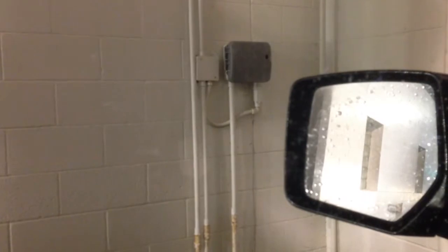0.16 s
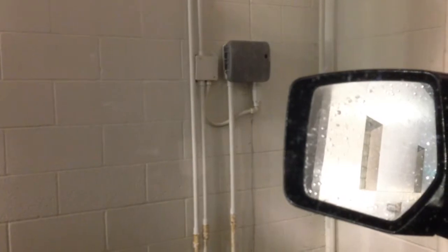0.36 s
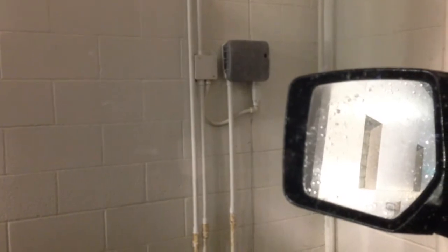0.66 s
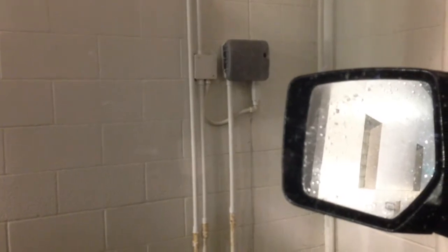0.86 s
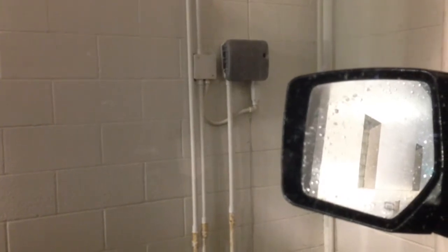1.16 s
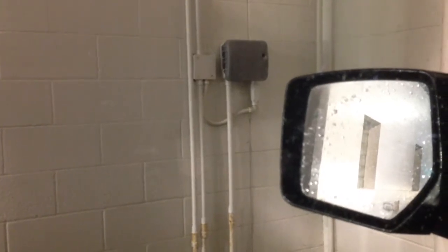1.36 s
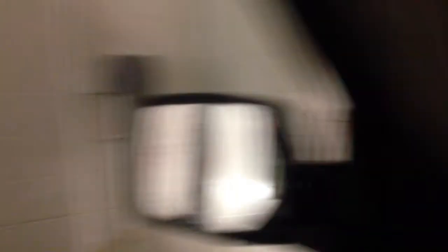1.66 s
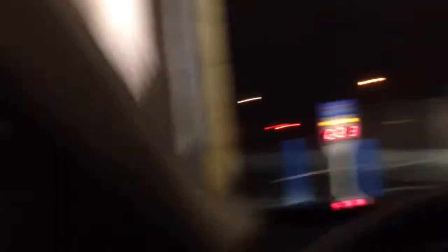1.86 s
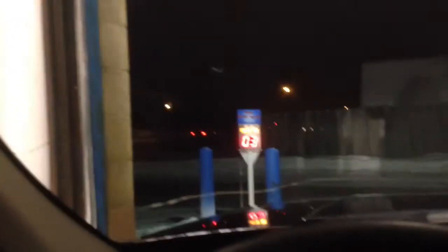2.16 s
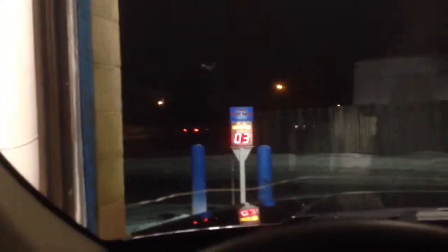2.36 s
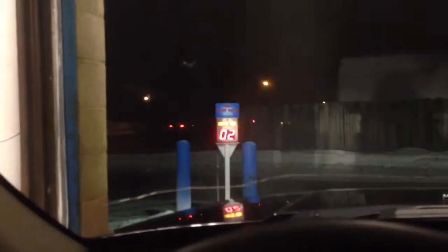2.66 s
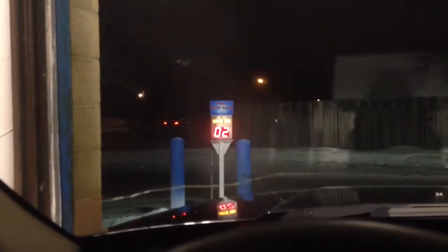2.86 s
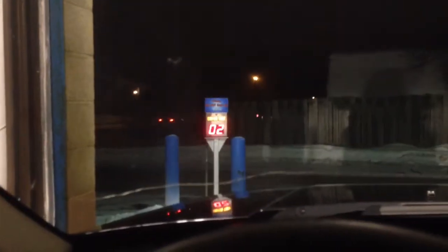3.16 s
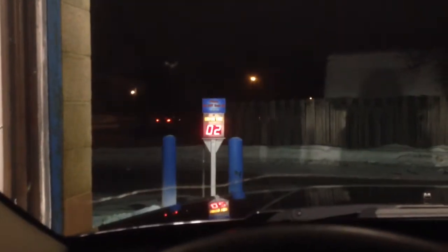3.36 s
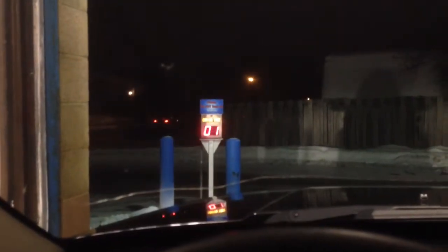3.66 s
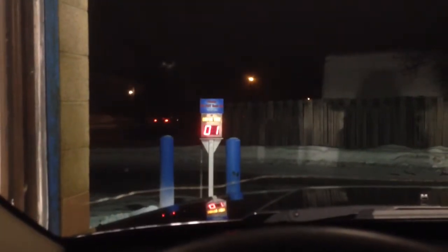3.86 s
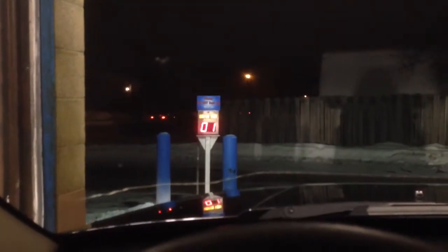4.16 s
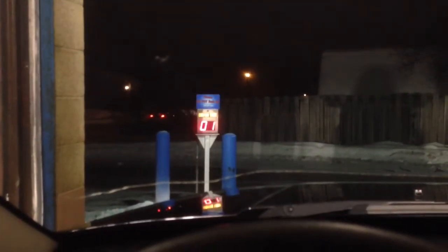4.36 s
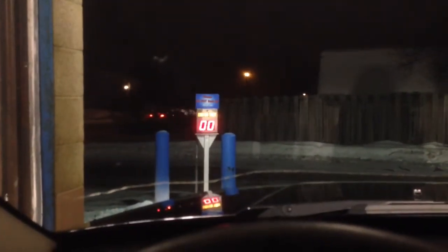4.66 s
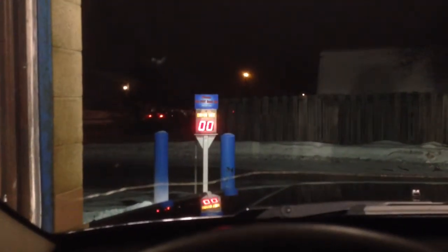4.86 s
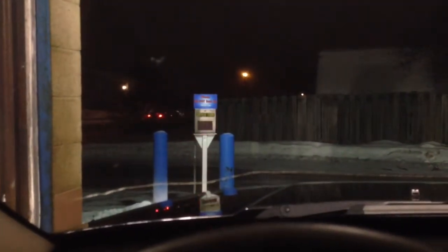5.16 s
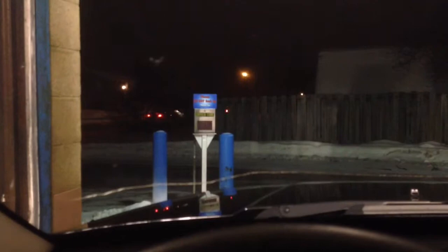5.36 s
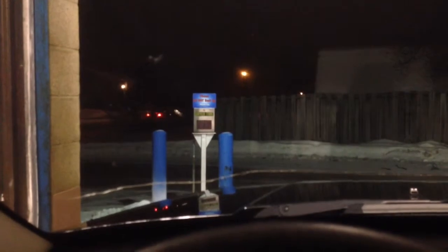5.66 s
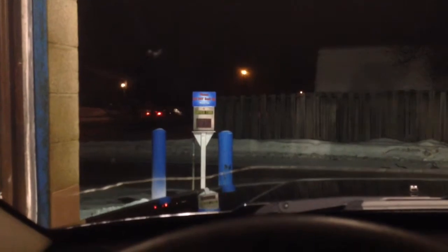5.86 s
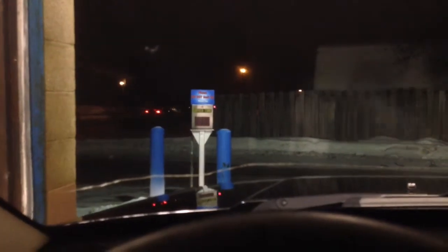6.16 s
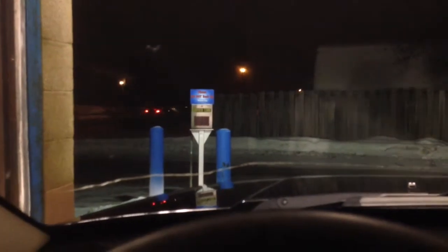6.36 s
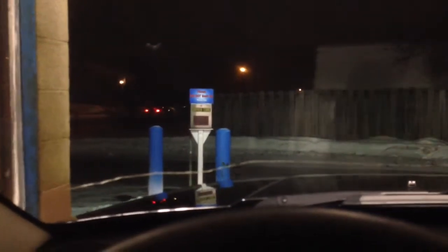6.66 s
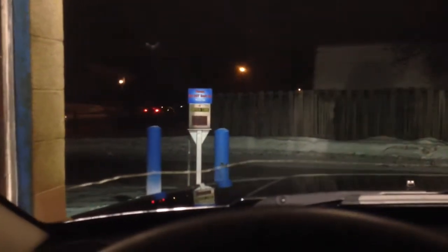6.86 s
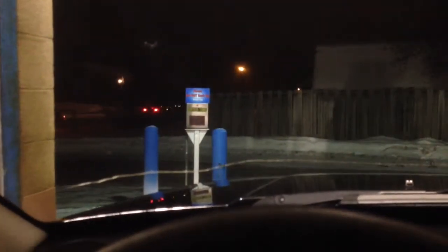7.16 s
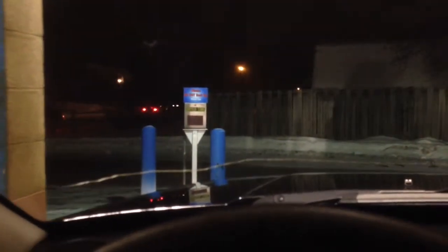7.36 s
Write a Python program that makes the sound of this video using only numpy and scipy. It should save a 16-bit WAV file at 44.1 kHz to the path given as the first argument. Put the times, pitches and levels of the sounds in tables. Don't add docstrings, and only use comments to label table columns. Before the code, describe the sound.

A car wash blower roars against a closed car, heard from inside as a deep buffeting boom with muffled rushing air, easing down at the end.

```python
import sys
import numpy as np
from scipy import signal
from scipy.fft import rfft, irfft
from scipy.io import wavfile
from scipy.ndimage import uniform_filter1d

SR = 44100
rng = np.random.default_rng(int(sys.argv[2]) if len(sys.argv) > 2 else 0)


def pcm_store(signal):
    levels = np.round(np.clip(np.atleast_2d(signal), -1, 1) * 32767)
    wavfile.write(sys.argv[1], SR, levels.astype(np.int16).T)


def amplitude_ratio(level_db):
    exponent = np.asarray(level_db, float) / 20
    return 10 ** exponent


N = 330750
T = np.arange(N) / SR
HZ = np.fft.rfftfreq(N, 1 / SR)

# (time [s], level [dB])
POWER_DB = [(0, -0.5), (1.5, 0.5), (3, 0), (4.5, 0.5), (5.1, -0.15), (5.5, -1.5), (5.9, -2), (6.3, -3.5),
            (6.7, -5), (7.05, -5), (7.2, -7.5), (7.5, -9)]
# (level at full power [dB], share of a power change followed [dB/dB])
THRUM_LAW = (-26, .4)
BOOM_LAW = (-16.5, 0.86)
RUSH_LAW = (-29, 0.97)
HISS_LAW = (-48, 1)
WHINE_LAW = (-45.5, 0.86)
MOAN_LAW = (-42, 0.27)
# (time [s], share [0-1])
SWING = [
    (0, 0.08),
    (1.45, 0.26),
    (1.75, 0.4),
    (2.05, 0.99),
    (7.5, 0.84),
]

# (frequency [Hz], density [dB per Hz])
THRUM_SPECTRUM = [(15, -30), (25, -20), (40, -8.5), (50, -4), (57, 6.5), (64, -7), (72, -3.5), (90, -14),
                  (150, -60), (400, -150)]
BOOM_SIDE = [(38, -41.5), (65, -12), (86, -6.5), (118, 1), (156, -3.5), (170, 0), (189, -6.5), (254, -11.5),
             (300, -20.5), (390, -51), (660, -120)]
BOOM_FRONT = [(38, -35.5), (65, -7.5), (86, -10.5), (119, -3), (161, 0), (195, -5.5), (231, -21.5),
              (300, -27), (390, -51.5), (660, -120)]
# (frequency [Hz], density [dB per Hz])
RUSH_SIDE = [(140, -31), (230, -3), (346, -12), (384, -13.5), (409, -28.5), (440, -15.5), (583, -14.5),
             (648, -23), (841, -18), (1050, -26.5), (1200, -26.5), (1770, -24), (2800, -40), (3640, -68.5),
             (6160, -120)]
RUSH_FRONT = [(140, -34), (230, -5.5), (328, -2.5), (409, -3), (444, -5.5), (548, -4), (750, -6.5),
              (850, -12), (954, -9.5), (1130, -13), (1580, -13.5), (2200, -20.5), (2800, -30), (3640, -56),
              (6160, -120)]
HISS_SPECTRUM = [(1800, -41.5), (2500, -3.5), (2900, -0.5), (3700, -2), (5000, -10), (7000, -19),
                 (10000, -28), (15500, -43)]
# (frequency [Hz], width [Hz], lift [dB])
RINGS_SIDE = [(112, 1.6, 3), (160.3, 18, 5), (346, 35, 2.5), (412, 25, 3.5), (600, 29, 4), (1192, 68, 7),
              (1350, 35, 2), (3246, 80, -0.5)]
RINGS_FRONT = [(122.5, 5.9, 4), (137, 16, 5), (156.6, 2.5, 5), (332, 41, 5), (485, 23, 5.5), (929, 14, 6),
               (1107, 28, -6), (1360, 26, 0), (3150, 41, 4.5)]
# (time [s], lift [dB], length [s])
BUFFETS = [(0.033, 5, 0.053), (0.277, 4.5, 0.1), (0.537, -1, 0.092), (.75, 2, 0.11), (0.974, 2, 0.12),
           (1.25, 4, 0.051), (1.464, -4.5, .05), (1.566, 3.5, 0.16), (2.02, 1.5, 0.069),
           (2.227, 6.5, 0.029), (2.485, 2.5, 0.15), (2.863, 1.5, .08), (3.284, 4.5, 0.038),
           (3.588, 2, 0.06), (3.758, 4, .08), (4.067, 2.5, .05), (4.165, -1.5, 0.052), (4.292, 6, 0.049),
           (4.498, 7.5, 0.044), (5.016, 1.5, 0.17), (5.494, -4, .05), (5.595, 2.5, 0.11),
           (5.924, 6.5, 0.023), (6.9, 0, 0.27), (7.173, -6.5, 0.037), (7.5, -11, 0.013)]
# (time [s], lift [dB], length [s])
SURGES = [(.04, 3.5, 0.045), (.25, -2, 0.11), (.57, 5, 0.087), (.86, -3.5, 0.091), (1.167, 5, 0.069),
          (1.27, -5, .06), (1.88, 6, .05), (2.04, 4, .05), (2.29, -2, .06), (2.578, 8.5, .05),
          (2.776, 6, .05), (3.07, -7.5, .06), (3.16, 5, .04), (3.3, -9, .05), (3.76, -4.5, 0.047),
          (3.94, -1, .05), (4.04, 6, 0.034), (4.103, -6, 0.022), (4.179, 10.5, 0.035), (4.5, 1.5, 0.056),
          (4.85, 5.5, 0.16), (5.17, -3, 0.037), (5.39, -18, 0.045), (5.507, 3.5, 0.045), (5.972, 11, 0.031),
          (6.41, 7.5, .08), (6.64, 4, .04), (7.04, 3.5, 0.068), (7.188, -4, .05), (7.472, 3.5, 0.056)]
# (frequency [Hz], width [Hz], level [dB])
WHINE_TONES = [(1550, 31, 0.5), (1697, 49, -2), (1814, 31, -3), (3125, 50, -18.5)]
MOAN_TONES = [(441, 38, 0)]
# (time [s], whine lift [dB], moan lift [dB], length [s])
SINGING = [(.57, 3, 2, .06), (.92, 11, 1.5, .06), (1.78, 1.5, 7.5, .1), (2.45, 1, 1.5, .15),
           (3.35, 3.5, 0.5, .1), (3.608, 5, 7, 0.037), (3.78, 2.5, -13, .06), (4.25, 3, 0, .06),
           (5.778, 4, -4, 0.073), (4.075, 6, -2, 0.044), (4.51, 0.5, 1.5, 0.21), (5.928, 0.5, 7, .06),
           (6.244, 4.5, 8, 0.056), (6.55, 5, -2, 0.09), (6.703, 3.5, 8.5, .08), (6.93, -1, 4, .06),
           (7.25, -8, -2.5, .15)]
# (peak time [s], bright level [dB], dull level [dB], length [s])
SPITS = [(.611, -66.5, -70, 0.0088), (1.092, -67.5, -64, .008), (1.167, -67.5, -65, .008),
         (1.29, -68, -59, .008), (1.74, -60.5, -55, 0.016), (2.362, -74.5, -68, .008),
         (2.572, -72.5, -66, 0.0073), (2.591, -55.5, -50, .016), (2.646, -70, -70, .008),
         (2.951, -71.5, -70, 0.0087), (3.032, -62, -60, 0.013), (3.355, -69.5, -70, .008),
         (3.49, -70, -67, .008), (3.739, -68.5, -66, .008), (3.802, -66, -63, 0.007),
         (3.859, -61, -59, 0.012), (3.928, -63, -62, .01), (3.963, -70.5, -67, .008),
         (4.173, -62, -57, .012), (4.422, -71.5, -66, 0.0069), (4.558, -73.5, -65, 0.0088),
         (4.823, -69, -67, .008), (5.030, -58.5, -51, .016), (5.082, -67.5, -60, .012),
         (5.406, -66.5, -55, .01), (5.474, -61.5, -61, .012), (5.750, -61, -56.5, .014),
         (5.995, -65, -48.5, .004), (6.919, -73, -75, 0.0052)]
# (frequency [Hz], density [dB per Hz])
SELF_NOISE_SPECTRUM = [(2000, -18.5), (5000, 4.5), (9000, -4), (12000, -2), (16000, -4.5)]


def white():
    return rng.standard_normal(N)


def evened(x):
    return x / np.sqrt(np.mean(x ** 2) + 1e-20)


def curve(rows, order=1):
    rows = np.array(rows)
    return np.interp(T, rows[:, 0], rows[:, order])


def driven(law, swells=(), order=1):
    full_db, share = law
    level_db = full_db + share * curve(POWER_DB)
    for row in swells:
        time_s, lift_db, length_s = row[0], row[order], row[-1]
        level_db = level_db + lift_db * np.exp(-((T - time_s) / length_s) ** 2)
    return amplitude_ratio(level_db)


def colour(noise, points, rings=()):
    points_hz, points_db = np.transpose(points)
    shape_db = np.interp(np.log(HZ + 1), np.log(points_hz + 1), points_db)
    for hz, width_hz, lift_db in rings:
        shape_db = shape_db + lift_db / (1 + (2 * (HZ - hz) / width_hz) ** 2)
    return evened(irfft(rfft(noise) * amplitude_ratio(shape_db), N))


def steadied(x, share, seconds):
    window = int(seconds * SR)
    power = uniform_filter1d(uniform_filter1d(x ** 2, window), window)
    return evened(x / (abs(power) + 1e-9) ** (share / 2))


def gusty(x, patchy_db, flicker_db):
    z = signal.stft(x, nperseg=512, noverlap=384)[2]
    patches = rng.standard_normal(z.shape[::-1]).T
    patches = uniform_filter1d(patches, size=6, axis=0)
    patches = evened(uniform_filter1d(patches, size=25, axis=1))
    flicker = evened(uniform_filter1d(rng.standard_normal(z.shape[1]), size=8))
    gain = amplitude_ratio(patchy_db * patches + flicker_db * flicker)
    return evened(signal.istft(z * gain, nperseg=512, noverlap=384)[1][:N])


def swung(side_spectrum, front_spectrum):
    noise = white()
    share = curve(SWING)
    side = colour(noise, side_spectrum, RINGS_SIDE)
    front = colour(noise, front_spectrum, RINGS_FRONT)
    start = np.argmin(side[:SR // 20])
    return (1 - share) * np.roll(side, -start) + share * np.roll(front, -start)


def cabin_boom():
    thrum = steadied(colour(white(), THRUM_SPECTRUM), share=0.61, seconds=0.097)
    boom = steadied(swung(BOOM_SIDE, BOOM_FRONT), share=0.45, seconds=0.15)
    boom = steadied(boom, share=-0.15, seconds=0.015)
    return driven(THRUM_LAW, SURGES) * thrum + driven(BOOM_LAW, BUFFETS) * boom


def rush():
    roar = gusty(swung(RUSH_SIDE, RUSH_FRONT), patchy_db=0.93, flicker_db=0.33)
    hiss = gusty(colour(white(), HISS_SPECTRUM, RINGS_FRONT[-1:]), patchy_db=0.3, flicker_db=0.57)
    windscreen_db = -0.96 * curve(SWING)
    pillar_s, pillar_db, pillar_length_s = 1.85, -1.5, 0.14
    pillar_shade_db = pillar_db * np.exp(-((T - pillar_s) / pillar_length_s) ** 2)
    return driven(RUSH_LAW) * amplitude_ratio(windscreen_db + pillar_shade_db) * roar + driven(HISS_LAW) * hiss


def blade_tone(tones):
    power = np.zeros(len(HZ))
    for hz, width_hz, level_db in tones:
        power += amplitude_ratio(level_db) ** 2 / (1 + (2 * (HZ - hz) / width_hz) ** 2) ** 2
    return steadied(irfft(rfft(white()) * np.sqrt(power), N), share=0.1, seconds=0.12)


def blades():
    whine = driven(WHINE_LAW, SINGING, order=1) * blade_tone(WHINE_TONES)
    moan = driven(MOAN_LAW, SINGING, order=2) * blade_tone(MOAN_TONES)
    return (whine + moan) * (0.098 + 1.085 * curve(SWING))


def spits():
    bright, dull = np.zeros(N), np.zeros(N)
    for peak_s, bright_db, dull_db, length_s in SPITS:
        u = (T - peak_s) / length_s
        puff = np.where(u < 0, np.exp(-(u / 0.33) ** 2), np.exp(-abs(u) / 0.86))
        bright += amplitude_ratio(bright_db) * puff
        dull += amplitude_ratio(dull_db) * puff
    fizz = colour(white(), [(5500, -20), (8000, 0), (12000, -5), (15500, -9), (17000, -40)])
    splat = colour(white(), [(2500, -25), (4500, -2.5), (6500, 1), (9000, -5), (11500, -29), (16000, -58.5)])
    return bright * fizz + dull * splat


def self_noise():
    return amplitude_ratio(-68.5) * colour(white(), SELF_NOISE_SPECTRUM)


def scene():
    return (cabin_boom() + rush() + blades() + spits())[None]


def top_cut(x):
    return signal.sosfilt(signal.butter(12, 15345, fs=SR, output="sos"), x)


def record(dry):
    x = dry + self_noise()
    ceiling = 1.6
    return top_cut(ceiling * np.tanh(x / ceiling))


dry = scene()
out = record(dry)
pcm_store(out)
```